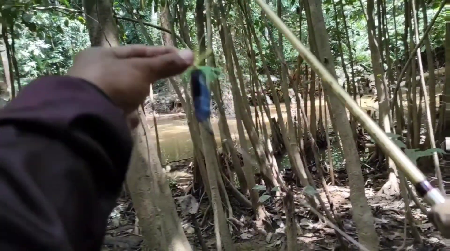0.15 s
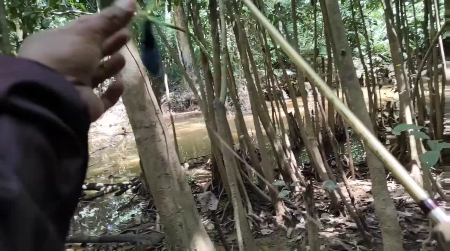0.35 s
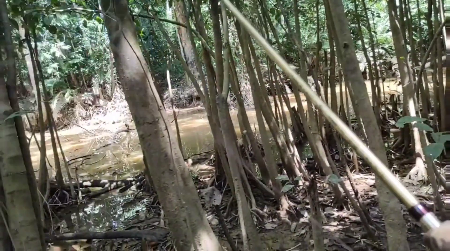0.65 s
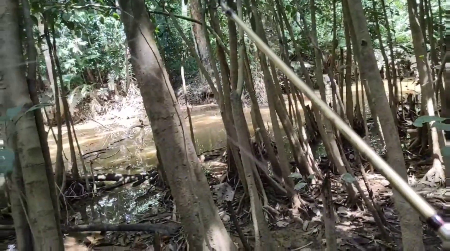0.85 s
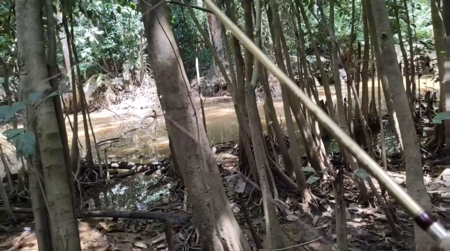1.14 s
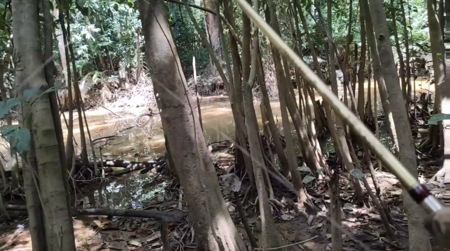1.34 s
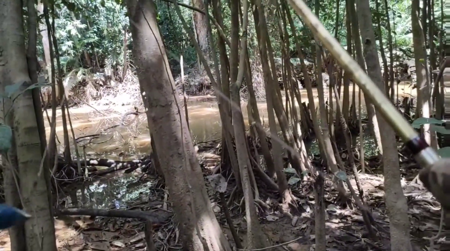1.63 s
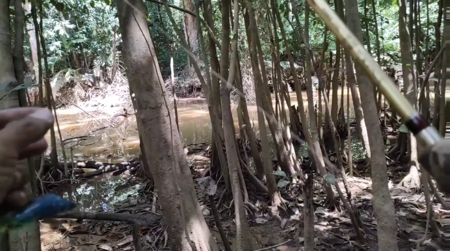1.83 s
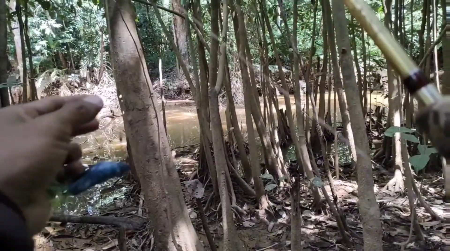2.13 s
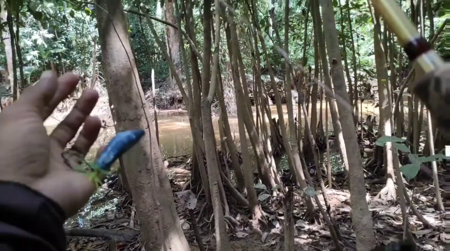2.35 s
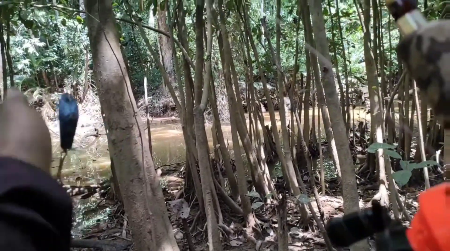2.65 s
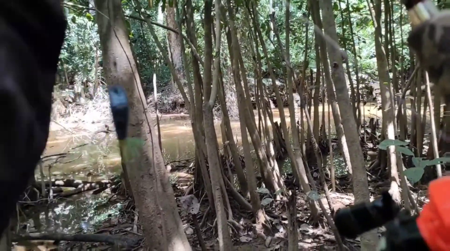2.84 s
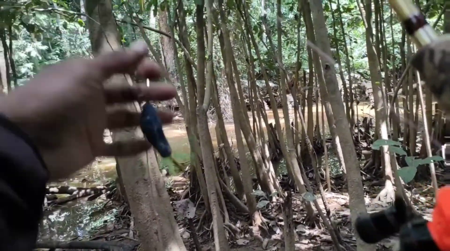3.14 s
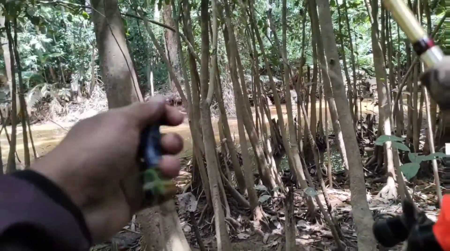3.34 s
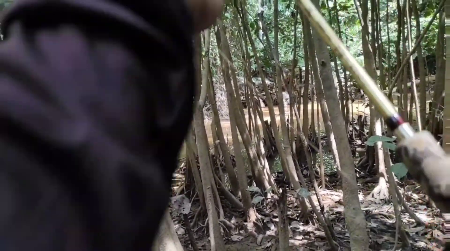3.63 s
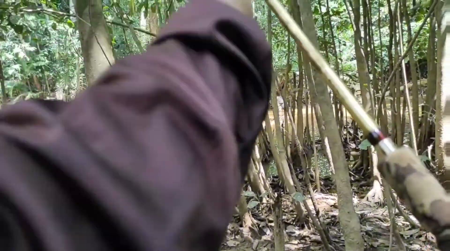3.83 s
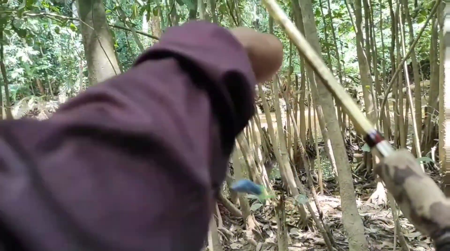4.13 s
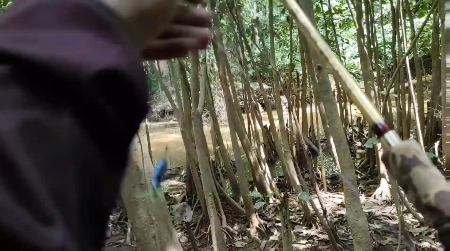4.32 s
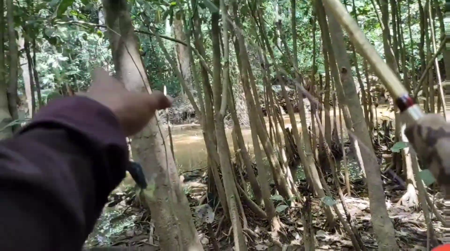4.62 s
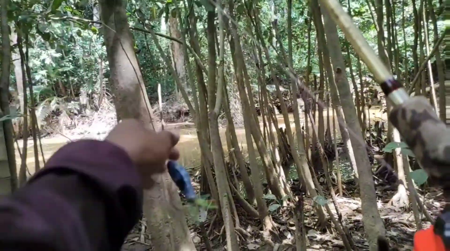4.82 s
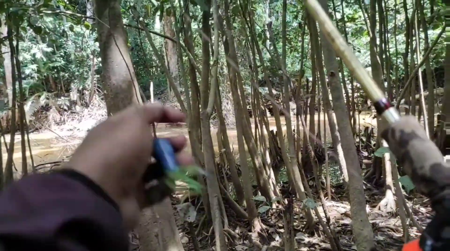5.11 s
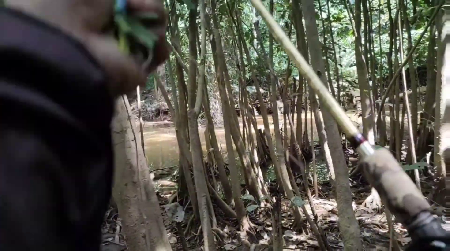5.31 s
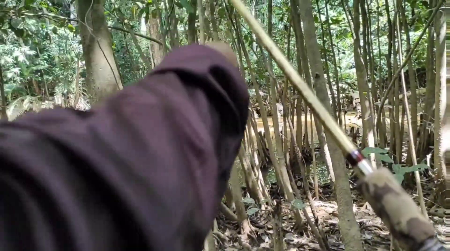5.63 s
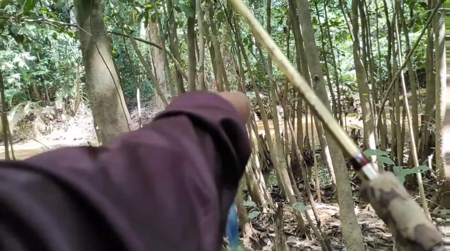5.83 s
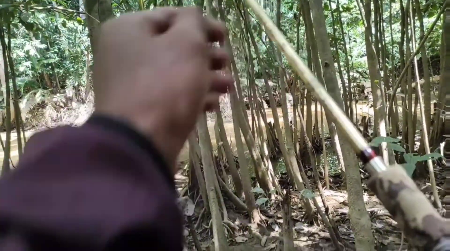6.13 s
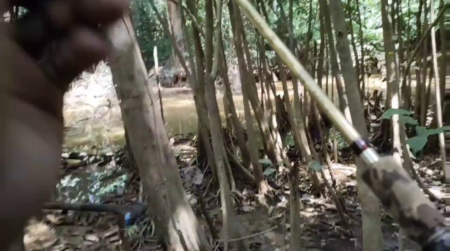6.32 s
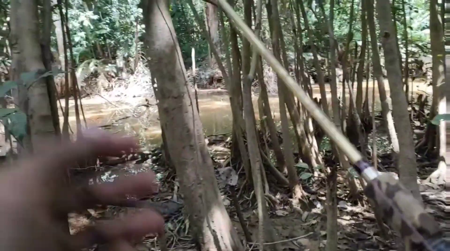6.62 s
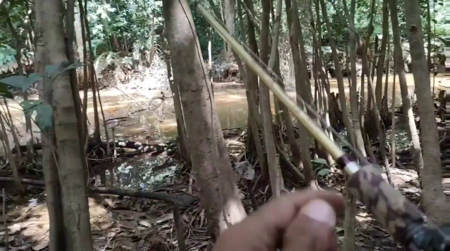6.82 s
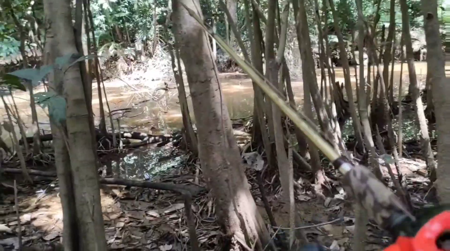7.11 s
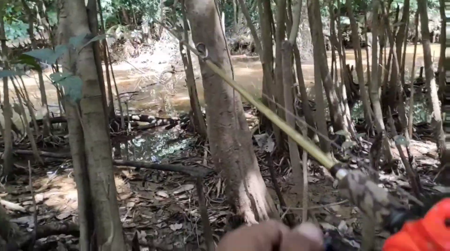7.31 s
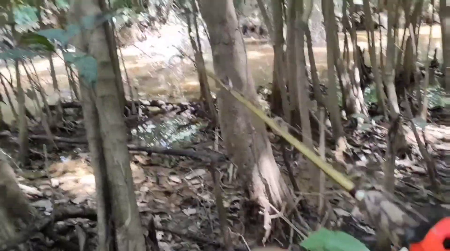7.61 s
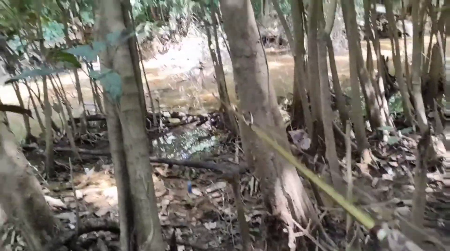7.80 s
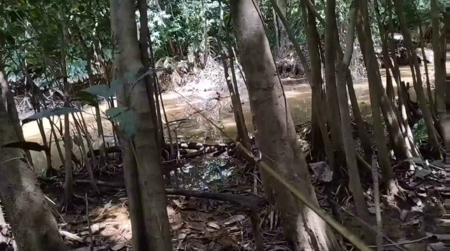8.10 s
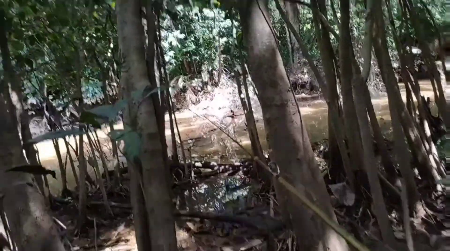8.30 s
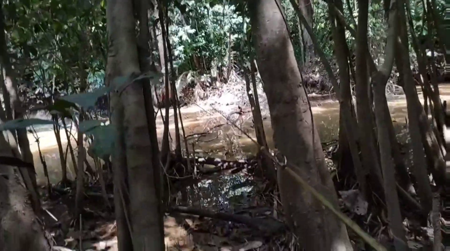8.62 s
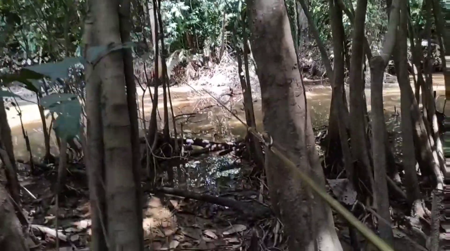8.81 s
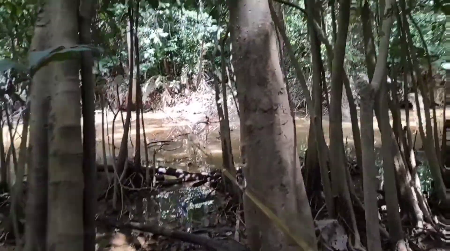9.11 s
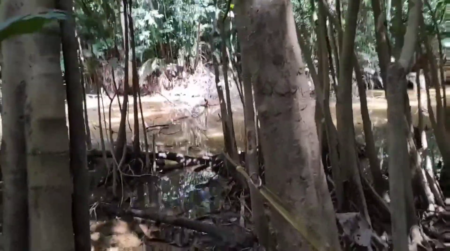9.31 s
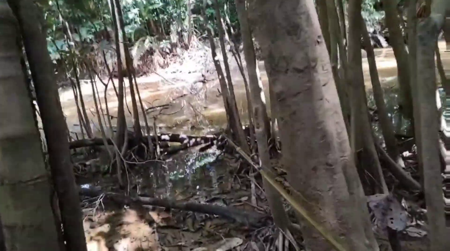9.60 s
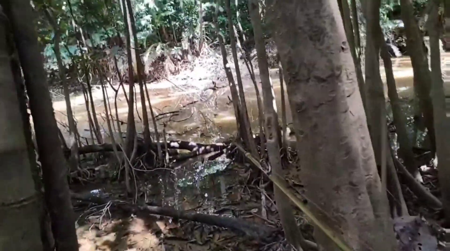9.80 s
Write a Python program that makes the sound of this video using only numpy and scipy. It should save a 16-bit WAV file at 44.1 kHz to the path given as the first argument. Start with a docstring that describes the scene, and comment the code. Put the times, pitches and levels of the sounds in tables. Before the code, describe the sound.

Cicadas shrill steadily in a forest with faint birds and a distant engine, as fishing tackle ticks and footsteps snap twigs.

```python
"""A swamp forest. Cicadas shrill without a break, their tymbals pulsing; an engine hums far off.
Birds chatter, rasp and whistle, echoed by the trunks. An angler's sleeve swishes and tackle ticks;
then the angler steps over damp leaf litter, and twigs snap as their fibres tear.
The sound is the same in both ears."""
import sys
import numpy as np
from scipy import signal
from scipy.fft import rfft, irfft
from scipy.io import wavfile

SR = 44100
rng = np.random.default_rng(int(sys.argv[2]) if len(sys.argv) > 2 else 0)


def digitize_waveform(pressure):
    """Quantize a signal to 16-bit integers and store it at the path in sys.argv[1].

    Rows of a 2-D input are taken as channels; values are limited to [-1, 1].
    """
    field = np.atleast_2d(pressure).T
    bounded = np.clip(field, -1, 1)
    quanta = np.round(bounded * 32767).astype(np.int16)
    wavfile.write(sys.argv[1], SR, quanta)


N = 438794
TIME_S = np.arange(N) / SR

# Far cicadas and their octave overtone. Each row: frequency in Hz, relative density in dB.
SHRILL_SPECTRUM = [(5000, -74), (5600, -26.5), (6100, -21.5), (6450, -9.5), (6850, -1), (7250, 4.5),
                   (7700, -1.5), (8000, -3), (8250, -15), (8750, -21), (9100, -44.5), (10000, -101)]
OCTAVE_SPECTRUM = [(9000, -47), (10500, -22.5), (11700, -0.5), (12700, -4.5), (13900, 7.5), (15500, -4.5)]
# Chorus loudness. Each row: time in seconds, relative level in dB.
CHORUS_CURVE = [(0, -51), (3.0, -51.5), (6.1, -51.5), (9.95, -50)]
# Near cicadas. Each row: tymbal pitch in Hz, width in Hz, level in dB, pulses per second,
# throbs per second, throb depth from 0 to 1.
CICADAS = [(6700, 88, -68.5, 180, 4.4, 0.3), (7050, 66, -62.5, 61, 4, 0.2),
           (7185, 36, -63.5, 160, 3.7, 0.2), (7340, 52, -68.5, 160, 6.3, 0), (7890, 37, -66.5, 76, 21, 0.5)]
# Twigs. Each row: time in seconds, knock pitch in Hz, knock, crack and sizzle energies in dB,
# ring pitch in Hz, tearing time in seconds, splinter share.
TWIG_SNAPS = [(7.1072, 2030, -40, -32, -15.5, 4000, 0.00074, 0.14),
              (7.1728, 1440, -25.5, -13.5, -3.5, 3540, 0.0036, 0.52),
              (7.174, 2060, -27, -18.5, -1, 6340, 0.00039, 0.099),
              (7.2026, 1240, -35, -19.5, -15, 2650, 0.0004, 0.4),
              (7.2226, 1700, -34, -41, -9, 5600, 0.00048, 0.08),
              (7.484, 1500, -40, -42, -24, 4700, .0005, 0.66),
              (7.556, 1510, -47, -29, -22, 5000, 0.0045, 0.52),
              (7.596, 1500, -39, -34, -38, 3900, .0006, .4), (7.666, 1280, -32, -44, -34, 3100, .001, 0.76),
              (7.716, 980, -36, -50, -42, 2700, 0.0011, 0.91), (7.756, 895, -31, -47, -36, 2690, .001, .8),
              (7.8242, 1490, -39, -46, -19, 5400, 0.00047, 0.28),
              (8.152, 985, -36, -53, -51, 2700, 0.00061, 0.25),
              (8.4443, 1890, -50, -38, -41, 3280, 0.00048, 0.66),
              (8.458, 1000, -22, -30, -16, 4700, 0.0038, 0.47),
              (8.674, 1040, -21, -38, -28, 3300, 0.00033, 0.58),
              (8.6952, 1600, -34.5, -44, -43, 2800, 0.00057, 0.75),
              (8.7255, 1710, -29, -21, -13.5, 2640, 0.0031, 0.35),
              (9.005, 1200, -50, -38, -43, 4230, .001, 0.69),
              (9.377, 1300, -30, -42, -41, 3600, 0.0012, 0.51),
              (9.417, 1070, -25.5, -29, -17.5, 5430, 0.00075, 1),
              (9.443, 1800, -20, -32, -29, 4800, 0.004, 0.54),
              (9.5262, 1120, -27, -31, -33, 3060, 0.00024, 0.83),
              (9.62, 1600, -34, -51, -38, 2700, .0008, 0.44),
              (9.679, 1180, -36, -41, -34, 2700, .001, 0.71)]
# Tackle. Each row: time in seconds, knock pitch in Hz, knock, crack and sizzle energies in dB,
# ring pitch in Hz, scraping time in seconds.
TACKLE_TICKS = [(0.1744, 2000, -70, -54, -35, 5400, .0006), (0.515, 1760, -48, -53, -56, 4020, .001),
                (2.8334, 1750, -46.5, -46, -47, 2750, .001), (3.1485, 1300, -43, -41, -50, 5200, .003),
                (3.245, 1360, -27, -27, -28, 3250, .0006), (3.5476, 1620, -45, -46, -25.5, 5400, 0.0014),
                (3.843, 1520, -56, -47, -37, 5400, .003), (4.07, 1800, -62, -50, -37, 5400, 0.0018),
                (5.1495, 1640, -46, -51, -48, 2960, .0008), (5.559, 2000, -55, -50, -33, 5400, 0.0023),
                (5.831, 2000, -58, -56, -35, 5400, 0.0022), (6.628, 2160, -42, -30.5, -24, 3980, 0.0024),
                (6.647, 1770, -37, -33, -27, 4600, 0.007), (6.693, 2100, -49, -52, -48, 4000, .005)]
# Knock of a snap or tick. Each row: multiple of the knock pitch, relative density in dB.
KNOCK_SPECTRUM = [(.03, -38), (.1, -6), (.3, -2.5), (.6, -10), (.85, 4.5), (1, 8.5), (1.2, 2.5), (1.5, -6),
                  (2, 5), (2.8, -17), (5, -69.5)]
# Its brighter parts. Each row: frequency in Hz, relative density in dB.
CRACK_SPECTRUM = [(1400, -30.5), (2150, -13.5), (2750, -2), (3400, -4), (4300, 5), (5400, 12.5),
                  (7000, -13.5), (10000, -20)]
SIZZLE_SPECTRUM = [(4000, -29.5), (6300, -5.5), (7500, 4), (8300, -0.5), (9300, -13), (10500, -33),
                   (12300, -24.5), (15000, -38.5)]
# Footfalls, and litter stirring under shifting feet. Each row: start in seconds, length in seconds,
# relative crunch and crackle levels in dB.
FOOTFALLS = [(7.19, 0.061, -82, -65.5), (7.28, 0.25, -72.5, -80), (7.53, 0.11, -66, -66.5),
             (7.61, .2, -64, -72), (7.92, 0.053, -69, -77), (8.37, 0.061, -70.5, -72),
             (8.43, 0.13, -64, -66.5), (8.6, 0.052, -69.5, -79), (8.7, 0.092, -73, -66),
             (8.92, 0.077, -68, -74.5), (9.31, .14, -61.5, -64), (9.56, 0.14, -63, -72),
             (9.72, 0.078, -71, -86)]
SHUFFLE = [(7.195, 2.75, -77, -100)]
# Damp leaves, dry leaves, soft ground. Each row: frequency in Hz, relative density in dB.
CRUNCH_SPECTRUM = [(60, -35), (150, -12), (450, -1), (900, 3), (1500, -2), (2000, -4), (2700, -6),
                   (3600, -12.5), (5200, -15), (9000, -35)]
CRACKLE_SPECTRUM = [(2000, 8), (4500, -7), (6000, 3.5), (7800, 7), (9000, 0.5), (10200, -11), (15000, -9.5)]
SOIL_SPECTRUM = [(40, -7), (110, -3), (180, 7), (300, -2.5), (500, 1), (800, -9), (1500, -41)]
# Harsh calls. Each row: note starts in seconds, note length in seconds, start and end pitch in Hz,
# arch share, beak factor on the throat frequencies, relative overtone level in dB,
# roughness from 0 to 1, jitter share, relative fundamental level in dB.
CHATTER_CALLS = [([.999, 1.074, 1.153, 1.239, 1.336], .042, 860, 660, .28, 1.03, -66.5, 0.42, .02, -69),
                 ([6.777, 6.88, 6.989], 0.05, 900, 1070, .04, 1.09, -61, 0.5, 0.085, -66)]
# Bird's throat. Each row: frequency in Hz, relative gain in dB.
THROAT_SPECTRUM = [(500, -36), (800, -25), (1100, 8), (1500, -6.5), (2300, -0.5), (2750, -2), (3350, 6),
                   (3900, -3.5), (4700, -6), (5600, -41)]
# Long scold. Each row: time in seconds, resonance in Hz, relative level in dB.
RASP_CURVE = [(4.35, 3500, -86), (4.365, 3500, -68), (4.39, 3350, -73.5), (4.47, 3120, -67.5),
              (4.52, 3220, -73), (4.57, 3140, -70), (4.65, 3080, -73.5), (4.75, 2940, -74.5),
              (4.79, 2870, -95)]
# Its hiss. Each row: frequency in Hz, relative density in dB.
RASP_SPECTRUM = [(500, -2), (900, 12), (1600, 0), (2300, 8), (3700, -8.5), (4500, -12), (5600, -31)]
# A bird's whistle and a very high squeak, one curve each.
# Each row: time in seconds, pitch in Hz, relative level in dB.
WHISTLE_CURVES = [
    [(1.87, 3720, -84), (1.92, 4200, -79), (1.96, 5020, -71), (2.03, 5080, -69), (2.08, 4800, -70),
     (2.18, 4850, -82), (2.36, 4800, -85)],
    [(3.06, 14100, -86), (3.09, 14850, -66), (3.11, 15100, -72), (3.14, 14700, -80), (3.16, 14900, -81),
     (3.2, 14300, -88)],
]
# Distant bird. Each row: start in seconds, centre pitch in Hz, relative level in dB.
PIP_NOTES = [(4.89, 2310, -89), (4.96, 2100, -89), (5.04, 2250, -89), (5.25, 2250, -88), (5.31, 2350, -89),
             (5.37, 2150, -89), (5.43, 2300, -93), (6.19, 2200, -85), (6.26, 2400, -92)]
# Sleeve movements. Each row: start in seconds, length in seconds, swish and scratch levels in dB.
SLEEVE_STROKES = [(.33, 0.091, -70.5, -78.5), (1.74, 0.11, -66.5, -77), (2.83, .1, -78, -80.5),
                  (3.02, 0.13, -63, -71.5), (3.5, 0.16, -70, -77.5), (3.78, 0.073, -89, -77),
                  (3.97, 0.066, -84, -80), (4.3, 0.24, -69, -77.5), (5.15, 0.21, -80, -84),
                  (5.52, 0.12, -69, -78), (5.69, 0.13, -70, -76), (5.82, 0.15, -66, -75.5),
                  (6.15, 0.2, -71, -77.5), (6.6, 0.06, -75, -70)]
# Swishing cloth, scratching weave. Each row: frequency in Hz, relative density in dB.
CLOTH_SPECTRUM = [(100, 3.5), (330, 8.5), (500, 4.5), (700, -1.5), (1000, -13), (1500, -48.5), (3000, -32),
                  (7000, -46)]
WEAVE_SPECTRUM = [(400, -2.5), (900, 9), (2600, -1.5), (4500, -5), (9000, -30), (15000, -14)]
# Loudest engine orders, keyed by multiple of the firing rate.
# Each row: time in seconds, relative level in dB.
LOUD_ORDER_CURVES = {6: [(0.0, -88), (0.58, -68), (1.05, -75), (1.13, -68.5), (1.63, -76.5), (2.41, -64),
                     (2.94, -69), (5.57, -72.5), (5.93, -66), (6.54, -88), (6.85, -65), (7.06, -71.5),
                     (7.12, -87), (7.37, -73.5), (9.89, -79.5), (9.95, -76)], 7: [(0.0, -67), (0.75, -70.5),
                     (0.8, -85), (1.33, -69), (1.94, -80), (2.27, -64.5), (3.18, -72), (3.32, -82),
                     (3.43, -74), (4.02, -69.5), (4.65, -78.5), (5.15, -69), (5.27, -74), (6.15, -69.5),
                     (8.12, -81), (9.95, -72.5)], 10: [(0.0, -78), (0.41, -76.5), (1.5, -65), (1.99, -84),
                     (2.05, -71.5), (3.32, -80), (3.41, -72.5), (5.32, -72.5), (5.46, -86), (5.51, -67.5),
                     (6.15, -71), (6.34, -78), (7.81, -73), (9.95, -83)]}
# Weaker orders. Each row: multiple of the firing rate, mean level in dB.
WEAK_ORDERS = [(1, -73.5), (2, -74.5), (3, -80), (4, -85.5), (5, -76.5), (8, -81), (9, -80.5), (11, -79.5),
               (12, -95.5), (13, -81.5), (17, -86.5), (22, -90), (23, -95.5), (28, -92)]
# Still forest air. Each row: frequency in Hz, relative density in dB.
AIR_SPECTRUM = [(15, 15.5), (45, -0.5), (110, 2), (250, 1), (450, 4), (800, -5), (1400, -14.5), (2300, -16),
                (3300, -21.5), (5500, -19), (9000, -55)]
# Echo among the trunks. Each row: frequency in Hz, time to fall 60 dB in seconds.
FOREST_T60 = [(200, .2), (1000, 0.2), (2300, 0.65), (3400, 0.62), (5000, 0.51), (8000, 0.29), (15000, 0.44)]


def gain_of(db):
    """Decibels to amplitude."""
    return 10 ** (np.asarray(db) / 20)


def unit_rms(x):
    """Scales to rms 1."""
    return x / np.sqrt(np.mean(x ** 2) + 1e-20)


def lookup(table, hz):
    """Interpolates a table on a log-frequency axis."""
    table_hz, values = np.transpose(table)
    return np.interp(np.log(hz + 1), np.log(table_hz + 1), values)


def curves(rows, t=TIME_S):
    """Each column of a curve table at times t."""
    times_s, *columns = np.transpose(rows)
    return [np.interp(t, times_s, column) for column in columns]


def drift(rate_hz):
    """Random wander of rms 1, up to about rate_hz."""
    t = np.linspace(0, TIME_S[-1], 16384)
    hz = np.fft.rfftfreq(len(t), t[1])
    lowpass = np.exp(-(hz / rate_hz) ** 2) * (hz > 0)
    return np.interp(TIME_S, t, unit_rms(irfft(rfft(rng.standard_normal(len(t))) * lowpass)))


def coloured(x, spectrum):
    """Filters by a spectrum, to rms 1."""
    hz = np.fft.rfftfreq(N, 1 / SR)
    return unit_rms(irfft(rfft(x) * gain_of(lookup(spectrum, hz)), N))


def impulse(spectrum, size=1024):
    """Causal impulse response of a spectrum, energy 1."""
    log_gain = np.log(gain_of(lookup(spectrum, abs(np.fft.fftfreq(size, 1 / SR)))))
    response = np.fft.ifft(np.exp(np.conj(signal.hilbert(log_gain)))).real
    return response / np.linalg.norm(response)


def resonate(x, hz, width_hz):
    """Two equal poles, gain 1; hz may glide."""
    carrier = np.exp(2j * np.pi * np.cumsum(hz * np.ones(len(x))) / SR)
    r = np.exp(-np.pi * width_hz / SR)
    return 2 * (carrier * signal.lfilter([(1 - r) ** 2], [1, -2 * r, r ** 2], x / carrier)).real


def strokes(rows, rise_s, fall_s):
    """One envelope per level column: each movement builds, holds and dies away."""
    powers = np.zeros((2, N))
    for start_s, length_s, *levels_db in rows:
        t = np.arange(0, length_s + 6 * fall_s, 1 / SR)
        shape = np.minimum(t / rise_s, 1) * np.exp(-np.maximum(t - length_s, 0) / fall_s)
        for power, db in zip(powers, levels_db):
            add(power, start_s, (gain_of(db) * shape) ** 2)
    return np.sqrt(powers)


def add(mix, start_s, sound):
    """Mixes a sound in at start_s."""
    part = mix[max(round(start_s * SR), 0):][:len(sound)]
    part += sound[:len(part)]


def cicada_chorus(trim_db=-0.44, octave_db=-82.5, swell_db=0.02, click_db=-14, clicks_per_s=60):
    """Countless far cicadas blur into a shrill band and a faint octave; single tymbal clicks stick out."""
    level_db, = curves(CHORUS_CURVE)
    clicks = unit_rms(rng.choice([-1, 1], N) * (rng.random(N) < clicks_per_s / SR))
    tymbals = rng.standard_normal(N) + gain_of(click_db) * clicks
    shrill = gain_of(level_db + trim_db) * coloured(tymbals, SHRILL_SPECTRUM)
    octave = gain_of(octave_db) * coloured(rng.standard_normal(N), OCTAVE_SPECTRUM)
    return (shrill + octave) * gain_of(swell_db * drift(8.5))


def near_cicadas(jitter=0.0039, decay_periods=0.49):
    """Each buckling of a tymbal excites its resonance; the pulses come in throbs."""
    out = np.zeros(N)
    for hz, width_hz, db, pulse_hz, throb_hz, depth in CICADAS:
        clock_s = np.cumsum(1 + jitter * drift(2.4)) / SR + rng.random()
        pulses = np.exp(-(clock_s * pulse_hz % 1) / decay_periods) * rng.standard_normal(N)
        throb = 1 + depth * np.sin(2 * np.pi * throb_hz * clock_s)
        out += gain_of(db) * unit_rms(resonate(pulses * throb, hz, width_hz))
    return out


def snaps(rows, fibre_share=2.05, break_s=0.00091, splinter_s=0.011, splinters_per_s=1500, ring_s=0.0005):
    """Fibres tear up to the break, then splinters let go; each piece rings briefly at its own pitch."""
    out = np.zeros(N)
    t = TIME_S[:2560] - TIME_S[512]  # zero at the break
    crack, sizzle = impulse(CRACK_SPECTRUM), impulse(SIZZLE_SPECTRUM)
    ping_t = TIME_S[:len(crack)]
    for at_s, knock_hz, knock_db, crack_db, sizzle_db, ring_hz, tear_s, splinter_share in rows:
        fibres, splinters = rng.standard_normal((2, len(t)))
        tear = unit_rms(fibres * np.exp(-abs(t) / np.where(t < 0, tear_s, break_s)))
        loose = (rng.random(len(t)) < splinters_per_s / SR) & (t > break_s)
        debris = unit_rms(splinters * loose * np.exp(-abs(t) / splinter_s))
        force = unit_rms(unit_rms(t == 0) + fibre_share * tear) + splinter_share * debris
        knock = impulse([(knock_hz * ratio, db) for ratio, db in KNOCK_SPECTRUM])
        ping = np.sin(2 * np.pi * ring_hz * ping_t) * np.exp(-ping_t / ring_s)
        ringing_crack = unit_rms(crack) + unit_rms(ping)
        for db, response in [(knock_db, knock), (crack_db, ringing_crack), (sizzle_db, sizzle)]:
            sound = signal.fftconvolve(force, response)
            add(out, at_s + t[0], gain_of(db) * sound / np.linalg.norm(sound))
    return out


def tackle(debris_share=0.25):
    """Tackle scrapes, ticks and rings, with the same shape as a snap."""
    return snaps([(*row, debris_share) for row in TACKLE_TICKS])


def grains(per_s, spread_db, decay_cycles, low_hz, high_hz, pitches=40, candidates=80000):
    """Random tiny fractures, each ringing briefly, a few much louder than the rest."""
    out, t = np.zeros(N), TIME_S[:1024]
    onsets = rng.integers(0, N, candidates)
    sizes = gain_of(spread_db * np.minimum(rng.exponential(1, candidates), 3))
    sizes *= rng.choice([-1, 1], candidates)
    sizes *= rng.random(candidates) < per_s * TIME_S[-1] / candidates
    for k, hz in enumerate(np.linspace(low_hz, high_hz, pitches)):
        ping = unit_rms(np.exp(-t * hz / decay_cycles) * np.sin(2 * np.pi * hz * t))
        fractures = np.bincount(onsets[k::pitches], sizes[k::pitches], N)
        out += signal.oaconvolve(fractures, ping)[:N]
    return out


def footsteps(thud_db=-2, crunch_db=3, crackle_db=6):
    """Soft ground thuds; leaves give way in clumps: damp ones crunch, dry ones crackle."""
    on_damp, on_dry = strokes(FOOTFALLS + SHUFFLE, rise_s=0.035, fall_s=0.045)
    damp = grains(per_s=4500, spread_db=2.6, decay_cycles=5, low_hz=500, high_hz=6000)
    dry = grains(per_s=2600, spread_db=2.8, decay_cycles=9, low_hz=3500, high_hz=15000)
    crunch = gain_of(crunch_db) * on_damp * coloured(damp, CRUNCH_SPECTRUM)
    crackle = gain_of(crackle_db) * on_dry * coloured(dry, CRACKLE_SPECTRUM)
    clumps = unit_rms(gain_of(2.2 * drift(45)))
    soil = grains(per_s=400, spread_db=2.5, decay_cycles=1, low_hz=130, high_hz=520)
    thud = gain_of(thud_db) * on_damp * coloured(soil, SOIL_SPECTRUM)
    return thud + clumps * (crunch + crackle)


def bird_chatter(beak_spread=0.025, swell=0.9, hiss_gain=3.0, arch_skew=0.9):
    """Arching notes, harsh overtones on a clear fundamental; the beak opens differently each time."""
    out, unsteady = np.zeros(N), drift(260)
    for starts_s, length_s, from_hz, to_hz, arch, beak, upper_db, rough, jitter, tone_db in CHATTER_CALLS:
        n = round(length_s * SR)
        progress = np.linspace(0, 1, n)
        bow = np.sin(np.pi * progress ** arch_skew)
        hz = (from_hz + (to_hz - from_hz) * progress) * (1 + arch * bow)
        harsh = np.clip(rough * (0.5 + bow), 0, 1)
        envelope = unit_rms(1 + swell * progress ** 2) * signal.windows.tukey(n, 0.3)
        for start_s in starts_s:
            opening = beak * (1 + beak_spread * rng.standard_normal())
            throat = impulse([(f * opening, db) for f, db in THROAT_SPECTRUM])
            turns = np.cumsum(hz * (1 + jitter * unsteady[round(start_s * SR):][:n])) / SR
            pulses = sum(np.cos(2 * np.pi * k * turns) / k ** 0.19 for k in range(2, 6))
            drive = (1 - harsh) * unit_rms(pulses) + hiss_gain * harsh * rng.standard_normal(n)
            overtones = gain_of(upper_db) * unit_rms(signal.fftconvolve(drive, throat)[:n])
            fundamental = gain_of(tone_db) * unit_rms(np.cos(2 * np.pi * turns))
            add(out, start_s, (overtones + fundamental) * envelope)
    return out


def bird_rasp(width_hz=700, ring_db=-3.5, hiss_db=-3.0, rattle_db=1.5):
    """One long scold: rattling hiss through a resonance that sinks as the beak closes."""
    out, t = np.zeros(N), np.arange(RASP_CURVE[0][0], RASP_CURVE[-1][0], 1 / SR)
    hz, db = curves(RASP_CURVE, t)
    puffs = (rng.standard_normal(N) * gain_of(rattle_db * drift(83)))[:len(t)]
    ringing = gain_of(ring_db) * unit_rms(resonate(puffs, hz, width_hz))
    hiss = gain_of(hiss_db) * unit_rms(signal.fftconvolve(puffs, impulse(RASP_SPECTRUM))[:len(t)])
    add(out, t[0], gain_of(db) * (ringing + hiss))
    return out


def whistles(trills_per_s=85, trill_depth_hz=214, jitter=0.16):
    """Thin gliding tones, made buzzy by a fast trill."""
    out = np.zeros(N)
    for rows in WHISTLE_CURVES:
        t = np.arange(rows[0][0], rows[-1][0], 1 / SR)
        hz, db = curves(rows, t)
        trill_turns = np.cumsum(trills_per_s * (1 + jitter * drift(30)[:len(t)])) / SR
        turns = np.cumsum(hz + trill_depth_hz * np.sin(2 * np.pi * trill_turns)) / SR
        add(out, t[0], gain_of(db) * np.sin(2 * np.pi * turns) * signal.windows.tukey(len(t), 0.1))
    return out


def bird_pips(length_s=0.079, sink=0.11, jitter=0.054):
    """A distant bird's short notes, each sinking a little."""
    out, t, unsteady = np.zeros(N), np.arange(0, length_s, 1 / SR), drift(200)
    for start_s, centre_hz, db in PIP_NOTES:
        waver = jitter * unsteady[round(start_s * SR):][:len(t)]
        hz = centre_hz * (1 + sink * (0.5 - t / length_s) + waver)
        note = np.sin(2 * np.pi * np.cumsum(hz) / SR) * np.hanning(len(t))
        add(out, start_s, gain_of(db) * unit_rms(note))
    return out


def sleeve(fold_db=3):
    """Cloth swishes softly and scratches as its folds catch."""
    swishing, scratching = strokes(SLEEVE_STROKES, rise_s=0.06, fall_s=0.15)
    swish = coloured(rng.standard_normal(N), CLOTH_SPECTRUM)
    scratch = coloured(rng.standard_normal(N) ** 3, WEAVE_SPECTRUM)
    folds = unit_rms(gain_of(fold_db * drift(23)))
    return swishing * swish + scratching * scratch * folds


def engine(firing_hz=29.17, speed_wander=0.00421, wander_rad=0.3, recede_db_per_s=0.26,
           weak_waver_db=2.9, loud_waver_db=1.5, loud_trim_db=-0.64):
    """Orders of a slow far engine waver on their way through the trees; the weaker ones slowly recede."""
    turns = np.cumsum(firing_hz * (1 + speed_wander * drift(1.62))) / SR
    recede_db = recede_db_per_s * (TIME_S - TIME_S.mean())
    orders = [(k, db - recede_db + weak_waver_db * drift(5.6)) for k, db in WEAK_ORDERS]
    for k, rows in LOUD_ORDER_CURVES.items():
        orders.append((k, curves(rows)[0] + loud_trim_db + loud_waver_db * drift(12.0)))
    hum = np.zeros(N)
    for k, db in orders:
        phase_rad = 2 * np.pi * (k * turns + rng.random()) + wander_rad * drift(4.3)
        hum += np.sqrt(2) * gain_of(db) * np.sin(phase_rad)
    return hum


def forest_air(level_db=-67.5):
    """The low, steady wash of the forest."""
    return gain_of(level_db) * coloured(rng.standard_normal(N), AIR_SPECTRUM)


def forest_echo(x, echoes_per_s=2500, first_echo_s=0.006):
    """Trunks scatter the sound; each band dies at its own speed."""
    taps = rng.standard_normal(SR) * (rng.random(SR) < echoes_per_s / SR) * (TIME_S[:SR] > first_echo_s)
    hz, t, bands = signal.stft(taps, SR, nperseg=256)
    decay = gain_of(-60 * t / lookup(FOREST_T60, hz)[:, None])
    _, tail = signal.istft(bands * decay, SR, nperseg=256)
    return signal.oaconvolve(x, tail / np.linalg.norm(tail))[:N]


def scene(angler_echo_db=-25, bird_direct_db=-1, bird_echo_db=-3, whistle_direct_db=-7):
    """The near angler is almost dry; the birds carry the forest's echo."""
    angler = footsteps() + tackle() + snaps(TWIG_SNAPS)
    birds = bird_chatter() + bird_rasp() + bird_pips()
    whistling = whistles()
    direct = angler + gain_of(bird_direct_db) * birds + gain_of(whistle_direct_db) * whistling
    echoes = forest_echo(gain_of(angler_echo_db) * angler + gain_of(bird_echo_db) * birds + whistling)
    mono = cicada_chorus() + near_cicadas() + engine() + forest_air() + sleeve() + direct + echoes
    return np.array([mono, mono])


def record(dry):
    """Steep low-pass at 15.6 kHz."""
    lowpass = signal.firwin(511, 15600, window=("kaiser", 9), fs=SR)
    return signal.oaconvolve(dry, lowpass[None], "same")


dry = scene()
out = record(dry)
digitize_waveform(out)
```